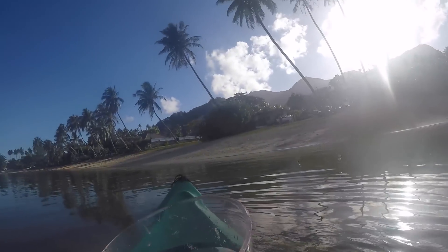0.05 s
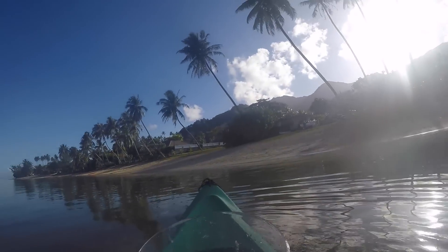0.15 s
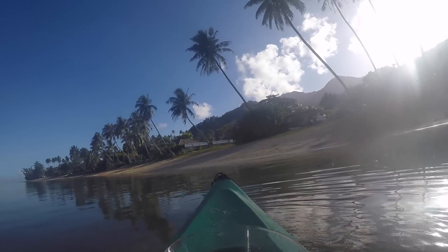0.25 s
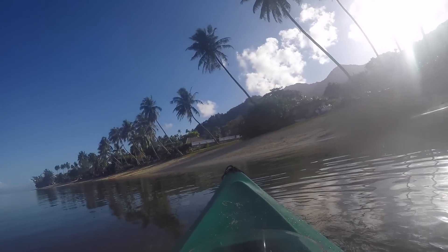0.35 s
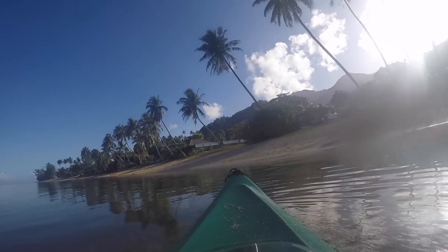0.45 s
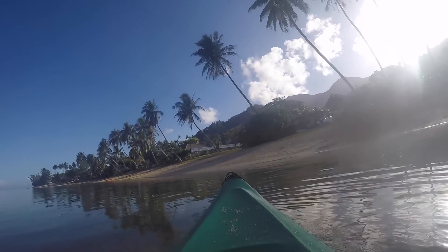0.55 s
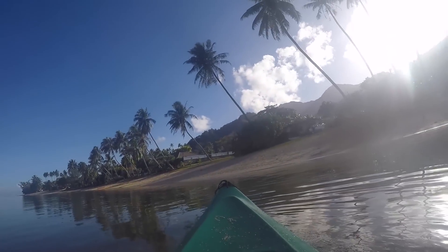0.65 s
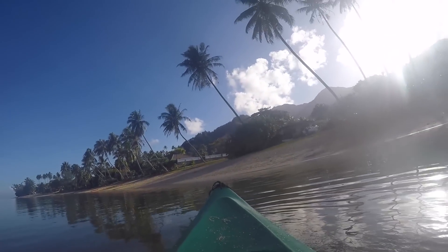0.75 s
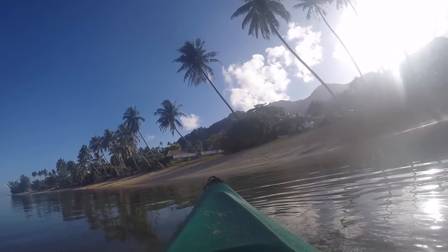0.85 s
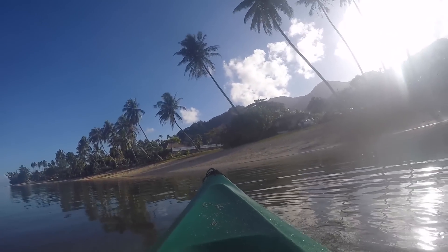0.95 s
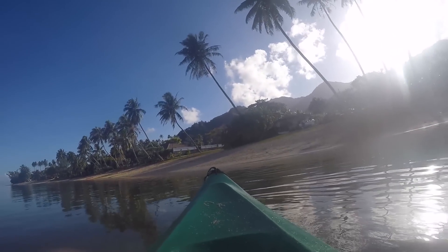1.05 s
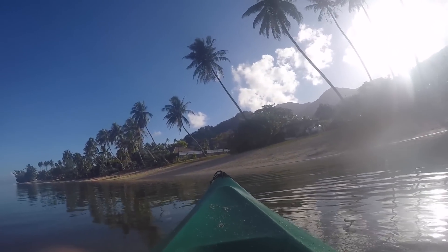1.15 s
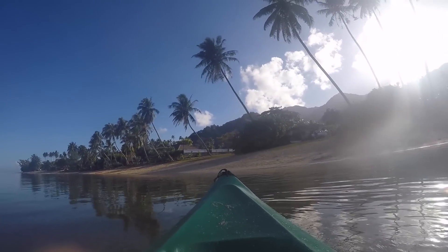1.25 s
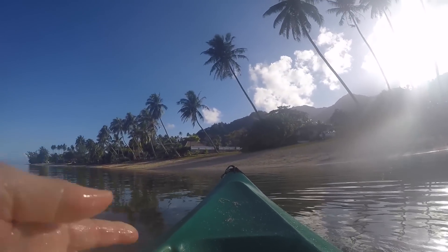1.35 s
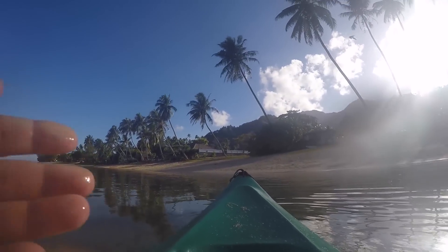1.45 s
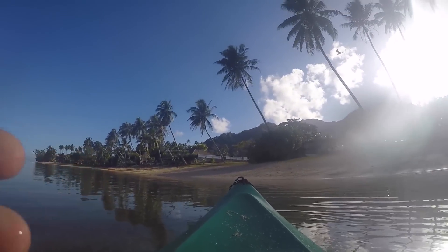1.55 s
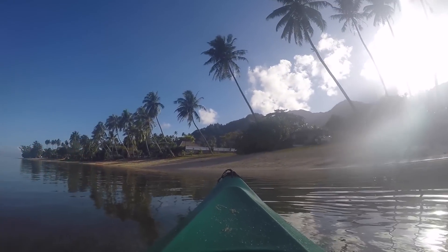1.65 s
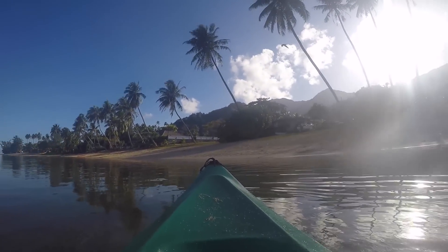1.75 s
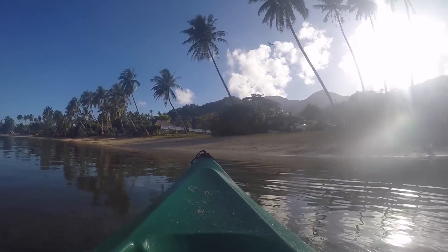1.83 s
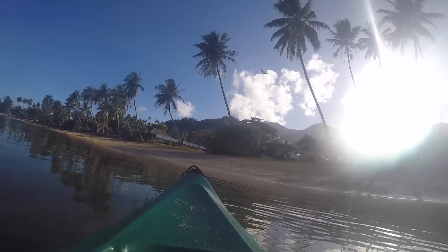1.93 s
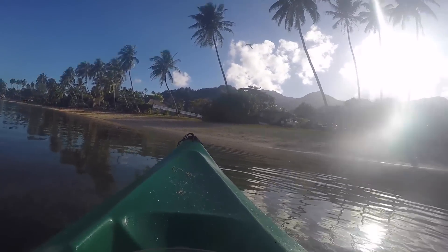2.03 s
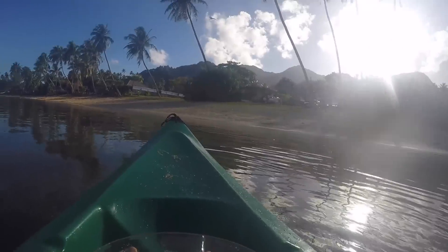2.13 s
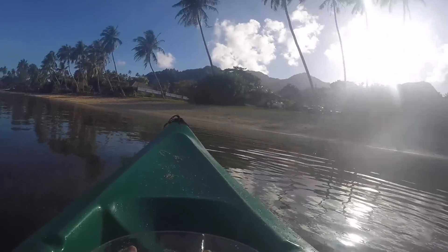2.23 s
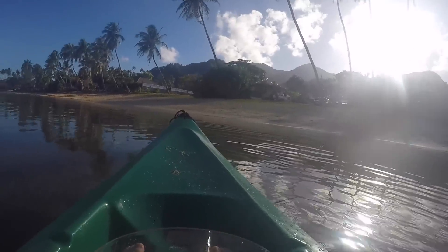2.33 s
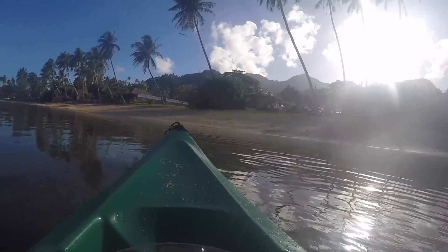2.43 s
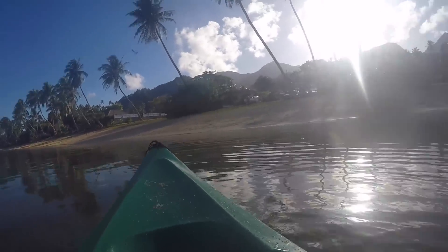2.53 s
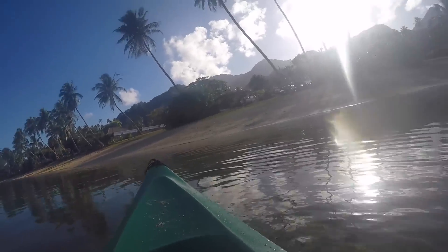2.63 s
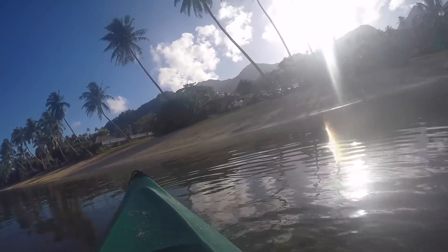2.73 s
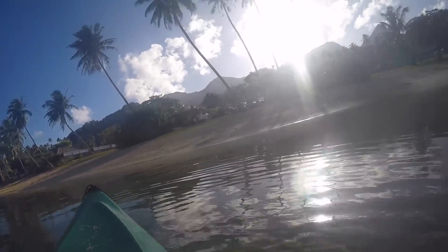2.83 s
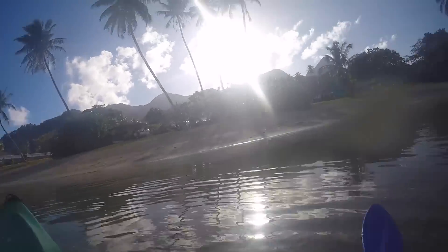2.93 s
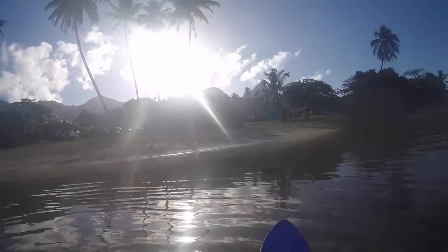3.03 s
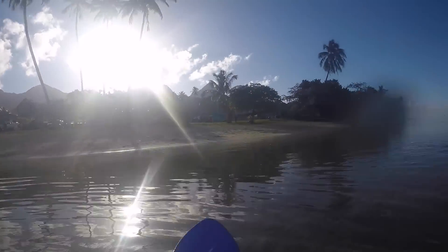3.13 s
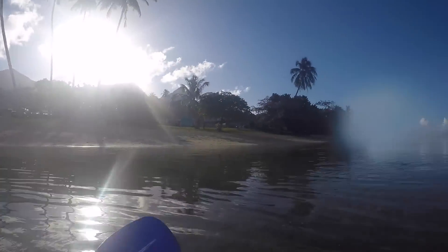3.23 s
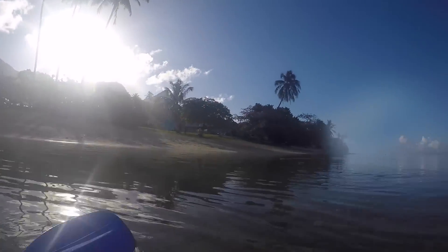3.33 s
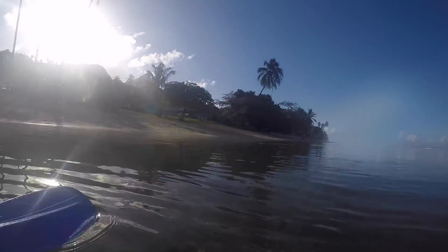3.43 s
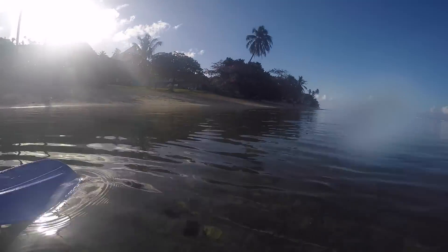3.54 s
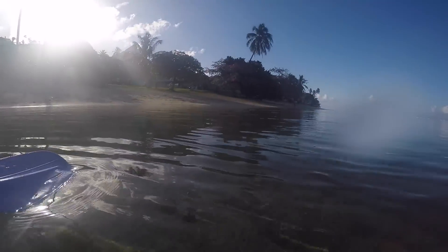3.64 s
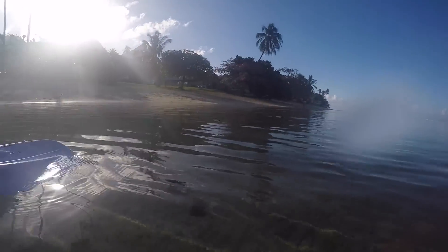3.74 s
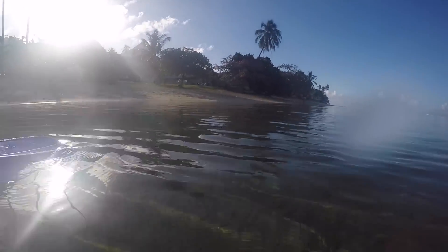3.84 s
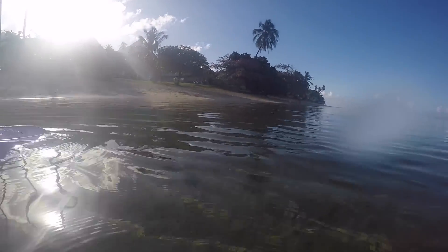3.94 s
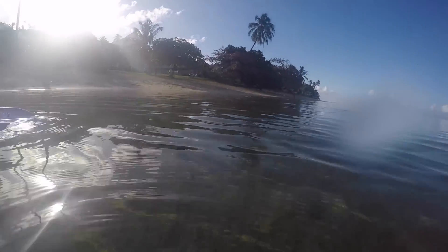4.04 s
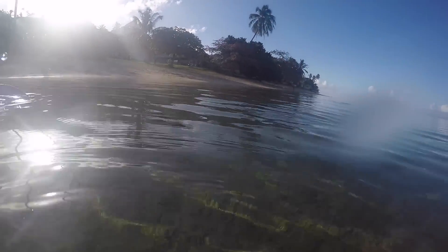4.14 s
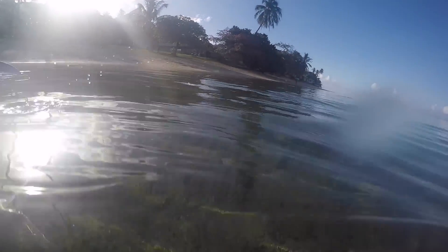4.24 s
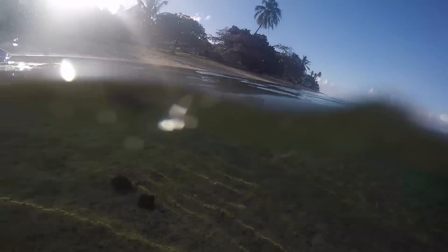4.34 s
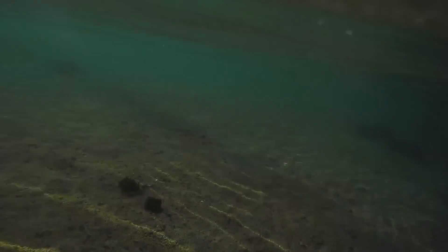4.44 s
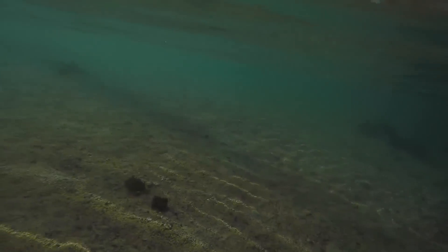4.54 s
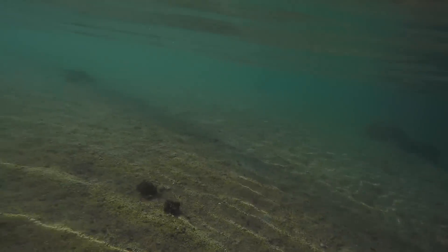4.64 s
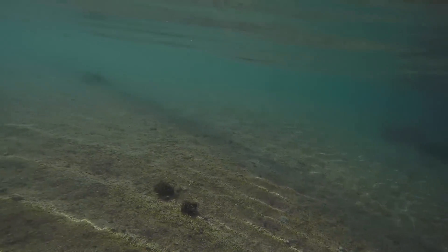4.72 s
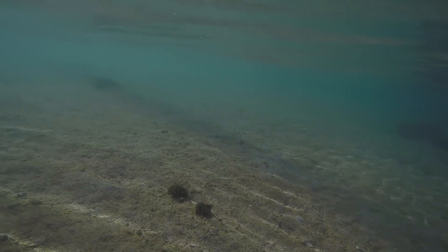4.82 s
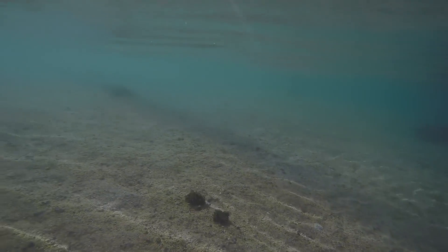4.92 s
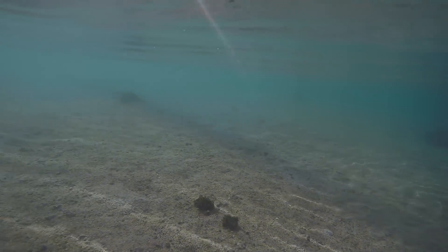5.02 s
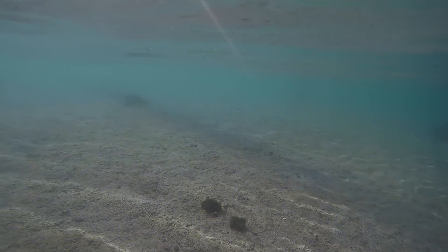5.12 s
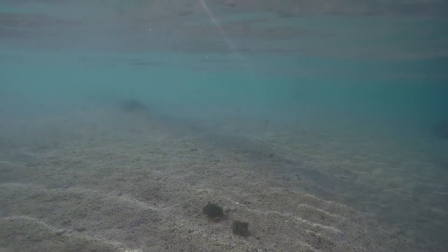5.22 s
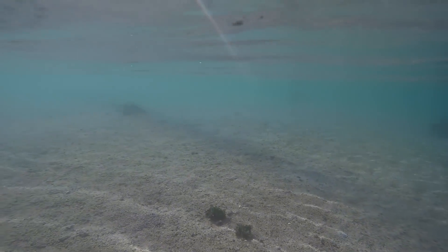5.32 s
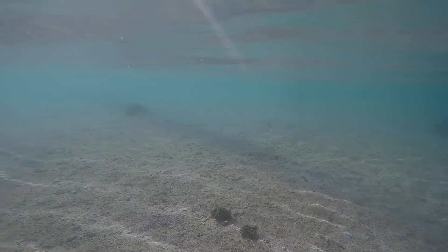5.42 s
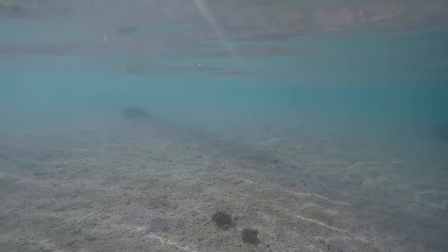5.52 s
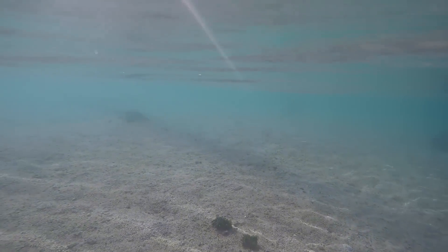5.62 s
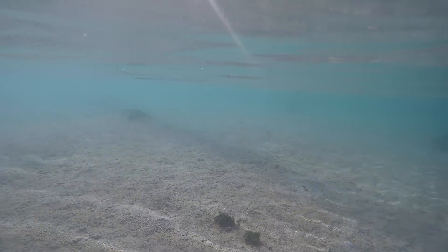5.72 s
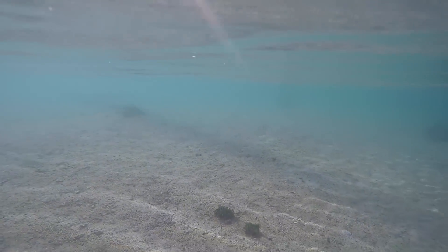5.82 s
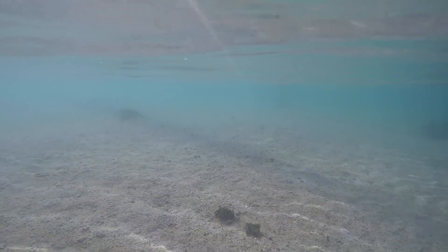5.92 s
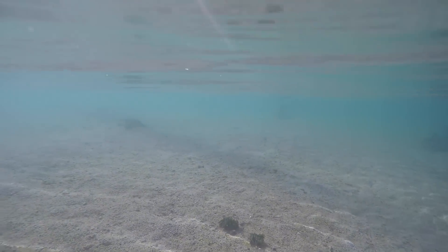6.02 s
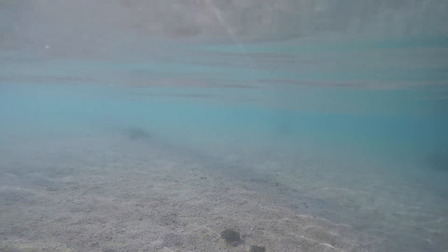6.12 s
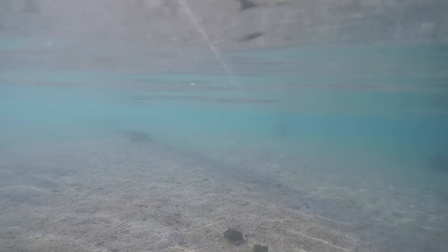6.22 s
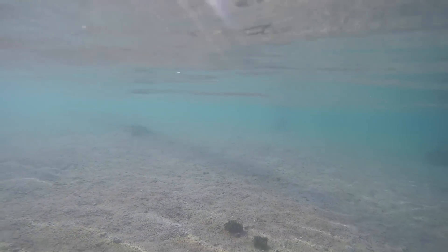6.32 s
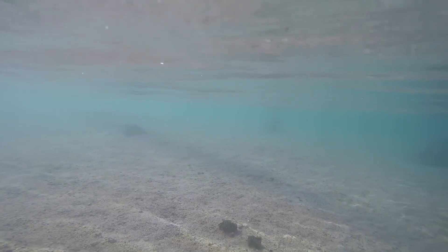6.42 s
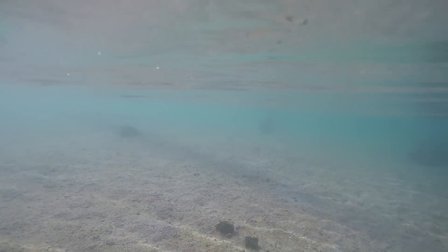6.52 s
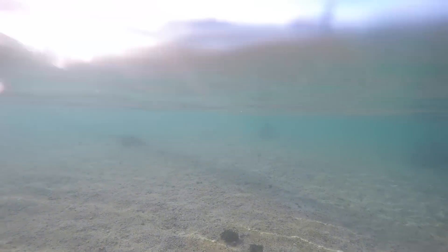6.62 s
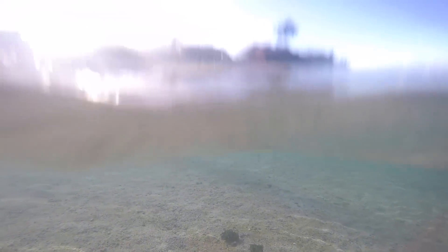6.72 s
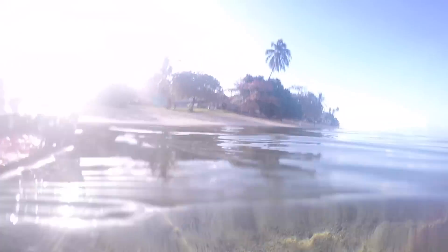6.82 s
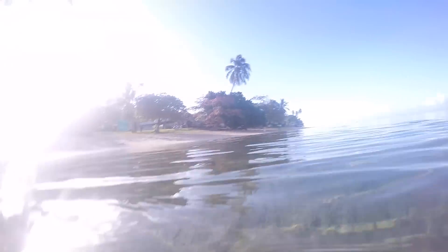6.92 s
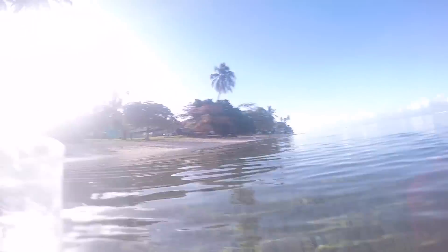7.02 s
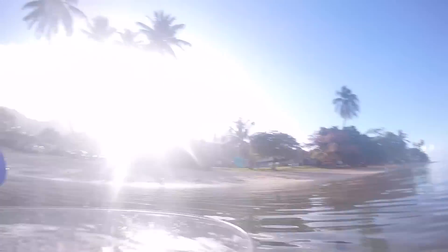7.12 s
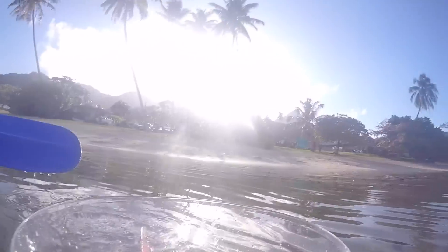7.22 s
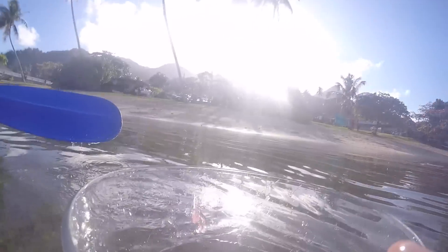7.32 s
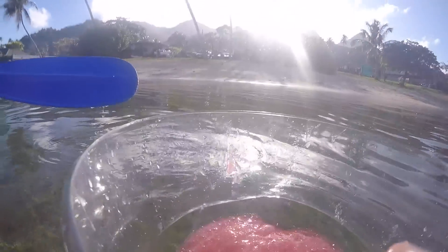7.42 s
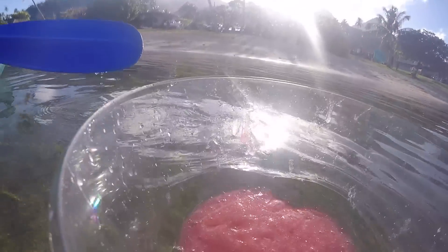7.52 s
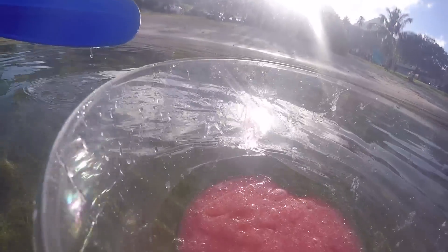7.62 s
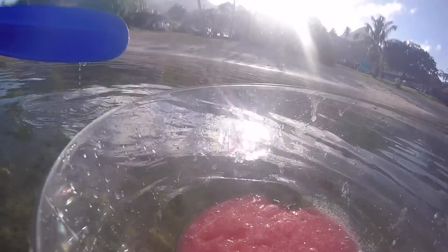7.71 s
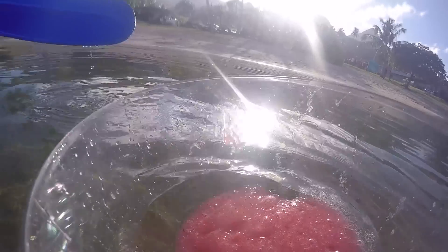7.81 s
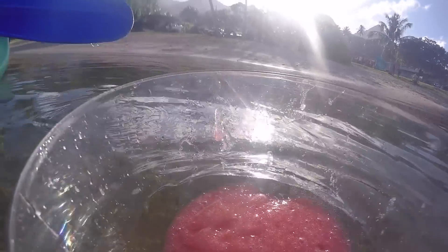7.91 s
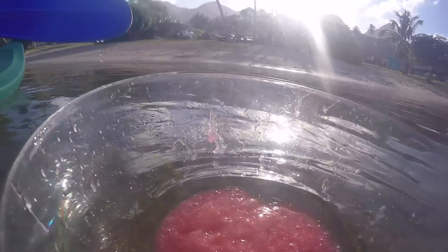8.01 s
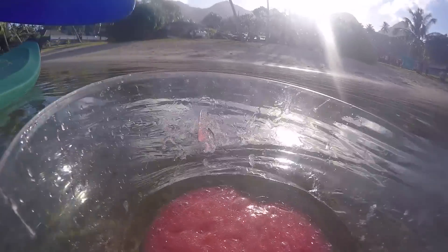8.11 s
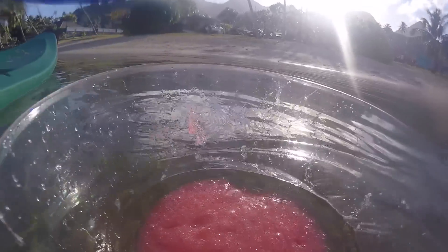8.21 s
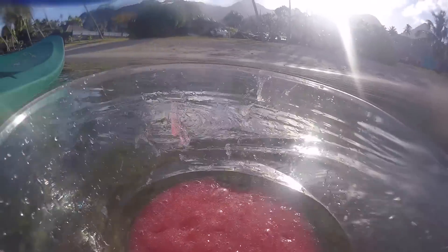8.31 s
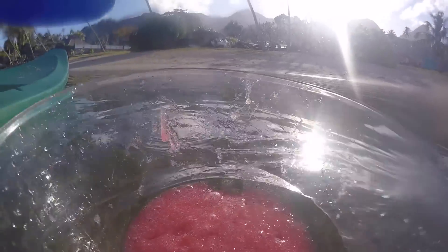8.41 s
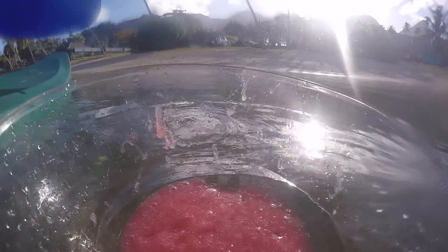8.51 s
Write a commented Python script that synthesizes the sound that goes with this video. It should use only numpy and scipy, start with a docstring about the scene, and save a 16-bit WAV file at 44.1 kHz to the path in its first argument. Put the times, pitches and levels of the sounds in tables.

```python
"""A hand-held camera in a waterproof case is dipped from a kayak into calm, shallow sea and lifted out again.
First wet fingers rub (tiny slips) and knock (ringing plastic) on the case, and its handling rumbles.
At the plunge, after 4.3 s, trapped air breaks into loud bubbles, heard as dying tones, among puffs of foam.
Under water it is quiet but for sharp ticks, short snaps that ring; these are heard above water as well.
On surfacing, at about 7 s, water sloshes off the case as crowds of small bubbles under a spray, then drips."""
import sys
import numpy as np
from scipy import signal
from scipy.fft import rfft, irfft
from scipy.io import wavfile
from scipy.ndimage import uniform_filter1d

SR = 44100
rng = np.random.default_rng(int(sys.argv[2]) if len(sys.argv) > 2 else 0)


def put_to_file(sound):
    """Save the sound as 16-bit audio at rate SR, in the file named by the first command-line argument."""
    columns = np.atleast_2d(sound).T  # one column per channel
    safe = np.clip(columns, -1, 1)
    whole_steps = np.round(safe * 32767)
    wavfile.write(sys.argv[1], SR, whole_steps.astype(np.int16))


N = 377496
T = np.arange(N) / SR   # time in seconds

# Soft bumps through the hand. Each row: start in seconds, peak level in dB, pitch in Hz,
# time to fall by 60 dB in seconds, contact cut-off in Hz.
BUMP_ROWS = [(0.116, -34, 120, 0.093, 300), (0.8624, -25, 105, 0.15, 400), (0.865, -24.5, 333, 0.051, 594),
             (1.595, -25.5, 133, 0.063, 298), (1.68, -27, 89, 0.089, 302), (1.729, -17, 45, 0.054, 250),
             (2.024, -17.5, 34.8, 0.12, 149), (2.15, 1, 38.8, 0.11, 250), (2.1532, -17, 112, .07, 260),
             (2.492, -3.5, 32.5, 0.17, 220), (2.7113, -11.5, 27.7, 0.21, 157), (3.477, -30, 98, 0.081, 250),
             (3.809, -31, 180, 0.096, 396), (4.168, -25.5, 168, 0.045, 300), (6.303, -31, 164, 0.024, 710),
             (7.156, -11.5, 42.5, 0.23, 191), (7.175, -15.5, 44.4, .12, 220), (7.484, -7, 39.6, 0.16, 70.4),
             (7.623, -20.5, 55, .045, 161), (8.408, -37.5, 212, 0.061, 397)]


def from_db(db):
    """Turn decibels into a gain."""
    return 10 ** (np.asarray(db) / 20)


def rms_one(x):
    """Scale to an average (rms) strength of 1."""
    return x / np.sqrt(np.mean(x ** 2) + 1e-20)


def peak_one(x):
    """Scale so that the highest peak is 1."""
    return x / np.max(np.abs(x))


def in_time(rows):
    """Draw straight lines between the rows of a table, sample by sample; one curve per column after the time."""
    s, *columns = np.transpose(rows)
    return [np.interp(T, s, column) for column in columns]


def add(track, s, sound):
    """Mix a sound into a track, starting at s seconds."""
    i = int(round(s * SR))
    track[i:i + len(sound)] += sound[:N - i]


def cut(x, hz, kind="low", order=2):
    """Keep what is below hz ("low") or above it ("high"), with a Butterworth filter."""
    return signal.sosfilt(signal.butter(order, min(hz, .45 * SR), kind, fs=SR, output="sos"), x)


def coloured(x, spectrum):
    """Shape the balance of pitches in a steady signal, steeply cut beyond both ends; rms 1."""
    hz, db = np.transpose(spectrum)
    octave = np.log2(np.maximum(np.fft.rfftfreq(N, 1 / SR), 1))
    outside = np.abs(octave - np.clip(octave, np.log2(hz[0]), np.log2(hz[-1])))   # octaves beyond the ends
    shape_db = np.interp(octave, np.log2(hz), db) - 36 * outside
    return rms_one(irfft(rfft(x) * from_db(shape_db), N))


def fall(t, t60):
    """Die away by 60 dB in t60 seconds."""
    return np.exp(-np.log(1000) * t / t60)


def drift(rate):
    """Wander at random between points drawn `rate` times a second, with spread 1 at the points."""
    knots = rng.standard_normal(int(rate * N / SR) + 2)
    return np.interp(T * rate, np.arange(len(knots)), knots)


def evened(x, span_s):
    """Take the slow swells out of a noise."""
    return x / np.sqrt(uniform_filter1d(x ** 2, int(span_s * SR)) + 1e-9)


def grains(per_s, spread_db):
    """Scatter clicks of uneven size and random sign over the whole time."""
    sizes = from_db(spread_db * np.minimum(rng.exponential(1, N), 5))
    return (rng.random(N) < per_s / SR) * sizes * rng.choice([-1, 1], N)


def mode(hz, t60):
    """Ring one struck tone that dies away."""
    t = T[:SR // 4]
    return np.sin(2 * np.pi * hz * t) * fall(t, t60)


def scatter(x, db, t60):
    """Smear a sound into a short diffuse tail of noise-like echoes."""
    t = T[:SR // 8]
    tail = rng.standard_normal(len(t)) * fall(t, t60)
    return from_db(db) * signal.fftconvolve(x, tail / np.sqrt(np.sum(tail ** 2)))[:N]


def swell(start, length, attack_s, release_s, sag_db=0):
    """Rise smoothly, sag along the length, then die away."""
    age = np.maximum(T - start, 0)
    near = (age > 0) & (age < length + 10 * release_s)
    t, out = age[near], np.zeros(N)
    rise = 1 - np.exp(-(t / attack_s) ** 2)
    sag = from_db(-sag_db * np.minimum(t / length, 1))
    out[near] = rise * sag * np.exp(-np.maximum(t - length, 0) / release_s)
    return out


def gestures(rows, attack_s, release_s, sag_db, edge_share=.14):
    """Strength of body and treble for strokes or gushes; long ones start and end more gently."""
    body, treble = np.zeros(N), np.zeros(N)
    for start, length, db, treble_db in rows:
        edge = edge_share * length   # seconds added to attack and release
        power = (from_db(db) * swell(start, length, attack_s + edge, release_s + edge, sag_db)) ** 2
        body += power
        treble += power * from_db(treble_db) ** 2
    return np.sqrt(body), np.sqrt(treble)


def through_case(x):
    """The case lifts its own narrow resonances in whatever slides over it; rms 1."""
    # Each row: pitch in Hz, width in Hz, added gain (plain factor).
    case_peaks = [(221, 22, 1.6), (492, 120, 1.1), (570, 51, 0.8), (890, 25, 0.78), (977, 88, 0.93),
                  (1055, 39, 0.29), (1381, 45, 0.92), (1776, 45, 0.68), (2970, 83, 1.3)]
    lifted = sum(gain * signal.lfilter(*signal.iirpeak(hz, hz / width, fs=SR), x)
                 for hz, width, gain in case_peaks)
    return rms_one(x + lifted)


def bubble_crowd(low_hz, high_hz, per_s, spread_db, cycles, count=20):
    """Small bubbles born at random, each ringing down by 60 dB in a few cycles at one of `count` pitches."""
    out = np.zeros(N)
    for hz in np.geomspace(low_hz, high_hz, count):
        r, w = from_db(-60 * hz / (cycles * SR)), 2 * np.pi * hz / SR   # decay and turn per sample
        births = grains(per_s / count, spread_db) + 1e-18
        out += np.sqrt(hz) * rms_one(signal.lfilter([1, 0, -1], [1, -2 * r * np.cos(w), r * r], births))
    return out


def bubbles(rise=0.026, echo_s=.0033, echo_db=-15, wobble=0.046):
    """Air bubbles and drops swell fast and ring down, wobbling as their pitch creeps up; the hull echoes them."""
    # Each row: start in seconds, pitch at the start in Hz, peak level in dB before the echoes and the notch,
    # time to fall by 60 dB in seconds.
    bubble_rows = [(2.2448, 1800, -19, .01), (2.28, 1510, -22.5, .02), (4.29, 960, -26.5, .025),
                   (4.334, 616, -20, .032), (4.3335, 5900, -30, .009), (4.338, 3000, -29, .02),
                   (4.3603, 1197, 2, .019), (4.363, 181, -16.5, .091), (4.3668, 4730, -19.5, .0065),
                   (4.369, 6300, -14.5, .0024), (4.3687, 3110, -8, .012), (4.3706, 2664, -6.5, .014),
                   (4.3714, 908, -3.5, .034), (4.3901, 2950, -15, .01), (4.3915, 1750, -4.5, .009),
                   (4.3937, 837, -9, 0.04), (4.3951, 586, -11, .032), (4.397, 143.8, -15, .058),
                   (4.3718, 430, -17.5, 0.044), (4.3992, 1975, -17.5, .012), (4.3995, 3000, -21, .025),
                   (4.4097, 1555, -18.5, .017), (4.4196, 2510, -1.5, .006), (4.423, 1251, 0.5, .026),
                   (4.4225, 2914, -16, .025), (4.431, 7190, -8, .005), (4.4701, 1210, -18.5, .02),
                   (4.471, 2110, -14.5, .003), (4.4707, 5360, -20, .007), (4.5298, 647, -17, .04),
                   (4.5291, 1410, -16, .038), (4.5535, 990, -35, .045), (4.553, 2200, -39.5, .008),
                   (4.616, 2326, 3.5, .011), (4.6156, 3110, -14.5, 0.019), (4.648, 858, -12, .031),
                   (4.6482, 1290, -14, .023), (4.696, 1351, -14.5, .032), (4.695, 3290, -9.5, 0.015),
                   (4.7664, 1936, -1.5, 0.016), (4.766, 2360, -10, .007), (4.818, 2170, 1.5, .011),
                   (7.034, 466, -19.5, .15), (7.048, 554, -19.5, 0.18), (7.061, 2380, -19, .016),
                   (7.125, 1820, -15.5, .015), (7.1865, 1906, -22.5, .054), (7.194, 1670, -30, 0.057),
                   (7.227, 1730, -25.5, .03), (7.2827, 1850, -27.5, .012), (7.389, 974, -24, .019),
                   (7.863, 3250, -53, 0.048)]
    swell_s, swell_cycles = 0.00042, 0.14   # a bubble swells for a moment plus a part of its cycle
    out, t = np.zeros(N), T[:SR // 8]
    for s, hz, db, t60 in bubble_rows:
        shake = rms_one(cut(rng.standard_normal(len(t)), hz / 3))
        pitch = hz * (1 + rise * np.minimum(t / t60, 1) + wobble * shake)
        phase = 2 * np.pi * np.cumsum(pitch) / SR
        envelope = (1 - np.exp(-(t / (swell_s + swell_cycles / hz)) ** 2)) * fall(t, t60)
        add(out, s, from_db(db) * peak_one(envelope) * np.sin(phase))
    echo = from_db(echo_db) * np.interp(T - echo_s, T, out)
    near_tail = scatter(out, db=-15.5, t60=0.005)
    far_tail = cut(scatter(out, db=-25, t60=0.061), 3000)
    heard = out + echo + near_tail + far_tail
    # the case passes little between its two lowest resonances
    return signal.lfilter(*signal.iirnotch(325, 1.6, fs=SR), heard)


def foam(grains_per_s=1200, spread_db=-0.5, cycles=9):
    """The plunge folds in crowds of tiny bubbles, puff by puff, as the case breaks the surface."""
    # Each row: start in seconds, level in dB.
    puffs = [(4.328, -39.5), (4.364, -19), (4.391, -21), (4.419, -24.5), (4.47, -37.5)]
    # Each row: pitch in Hz, relative level in dB per Hz.
    foam_colour = [(450, -3.5), (900, 6.5), (1800, 1.5), (3000, -1.5), (4500, -5.5), (6500, -13.5),
                   (9000, -24), (15000, -27.5)]
    attack_s, fade_s = 0.0036, 0.0087
    strength = sum(from_db(db) * swell(s, attack_s, attack_s, fade_s) for s, db in puffs)
    return strength * coloured(bubble_crowd(450, 14200, grains_per_s, spread_db, cycles), foam_colour)


def tick(hz, snap_db, ring_t60=0.0084, snap_t60=0.0015, edge_hz=9000, wall_hz=640, wall_db=-27, wall_t60=0.022):
    """A broad snap with a short ring, without bass; it faintly stirs the wall of the case."""
    t = T[:SR // 4]
    snap = cut(rng.standard_normal(len(t)) * fall(t, snap_t60), edge_hz, order=1)
    ping = cut(mode(hz, ring_t60) + from_db(snap_db) * peak_one(snap), 1300, "high")
    return ping + from_db(wall_db) * mode(wall_hz, wall_t60)


def ticks(crackle_db=-52.0, crackle_per_s=70):
    """Sharp ticks of water on the case, over a faint, dry crackle of mixed pitch."""
    # Each row: start in seconds, level of the ring in dB before its bass is cut, pitch of the ring in Hz,
    # level of the snap in dB against the ring.
    tick_rows = [(0.054, -38.5, 2700, 8.5), (.236, -50, 3500, 14), (0.904, -35, 3300, 3),
                 (0.9453, -40, 4300, 5), (1.7089, -15, 5320, -5), (1.7113, -16, 2560, -17),
                 (2.246, -27.5, 3170, -17), (2.2804, -27.5, 2600, -3.5), (2.6586, -39, 4220, 0),
                 (2.9029, -35, 2500, 1), (3.538, -37, 4170, -17), (3.698, -42.5, 2900, -14),
                 (3.806, -42.5, 5000, 7), (4.2244, -42, 5670, -9), (4.25, -33, 4440, -14),
                 (4.3155, -40.5, 5400, 12), (4.3504, -19.5, 5140, 4), (4.357, -21, 2190, 1),
                 (4.368, -13, 3500, -18), (4.3895, -17, 3230, 5.5), (4.3917, -20, 4100, 2.5),
                 (4.4178, -23, 4030, -9), (4.4329, -15, 3830, 4), (4.4613, -22, 2720, 7),
                 (4.4733, -23.5, 4010, -18), (4.592, -19.5, 2633, -9), (4.6147, -4, 2700, -38),
                 (4.7336, -37, 2300, 4), (4.8013, -24, 2300, -9), (4.8202, -21, 2590, -1),
                 (4.8638, -32, 2500, 6), (5.374, -50.5, 5800, 14), (5.5105, -39, 5900, 3),
                 (5.7716, -41.5, 5220, 3), (6.278, -37.5, 2357, 5.5), (6.305, -35.5, 2370, 1),
                 (6.3496, -13, 2410, -2.5), (6.3512, -23, 1930, -22), (6.3518, -23, 3330, -8),
                 (6.3732, -32, 2230, 3), (6.3945, -42, 2090, -7), (6.4121, -31, 2520, 10),
                 (7.521, -47, 6670, 16.5), (7.536, -43, 5500, 5), (7.8296, -42.5, 3290, 8),
                 (7.909, -42, 3480, -2.5), (8.0754, -31, 3086, -16.5)]
    out = np.zeros(N)
    for s, db, hz, snap_db in tick_rows:
        add(out, s, from_db(db) * tick(hz, snap_db))
    pitches = (2400, 3600, 5500)   # Hz
    for hz in pitches:
        pop = peak_one(tick(hz, snap_db=13))
        pops = signal.fftconvolve(grains(crackle_per_s / len(pitches), 3.0), pop)[:N]
        out += from_db(crackle_db) * pops   # the level of the smallest pops
    return out


def knocks(crack_db=-9, crack_t60=0.037, vary_db=1):
    """Hard knocks and slaps crack and ring the modes of the plastic case; hand and water damp them."""
    # Each row: start in seconds, peak level in dB, contact cut-off in Hz, factor on the ring times of the case.
    knock_rows = [(0.8567, -13.5, 4500, 1.07), (1.5429, -23, 1380, 1.1), (1.672, -22, 1480, 0.77),
                  (1.7069, -22.5, 7000, 0.67), (1.7856, -25, 2000, 0.68), (2.0204, -21.5, 1100, 3.3),
                  (2.4893, -17, 940, 0.24), (2.6949, -22.5, 990, 2.6), (2.7056, -17, 960, 0.25),
                  (3.451, -31, 1950, 0.76), (3.805, -25.5, 1030, 1.2), (4.1568, -20, 1900, 0.3),
                  (4.1687, -19, 1900, 0.23), (4.213, -26.5, 2030, 0.25), (7.1228, -17, 1990, 0.46),
                  (7.2137, -17.5, 1910, 0.5), (7.2595, -25.5, 2500, 0.29), (7.273, -27, 2000, 0.19),
                  (7.335, -28.5, 2520, 0.35)]
    # Each row: pitch in Hz, relative level in dB, time to fall by 60 dB in seconds before a knock's own factor.
    case_modes = [(217, -25, 0.2), (315, -32, 0.027), (534, 2.5, 0.0057), (753, 4.5, 0.011),
                  (975, 5, 0.021), (1305, -1.5, 0.024), (1856, 1.5, 0.017), (2800, -24, 0.032),
                  (2990, -5.5, 0.02), (4000, -6.5, 0.013), (4850, 3.5, 0.0046), (6360, 6, 0.0019),
                  (8780, 1.5, 0.0051), (12000, -33, .01)]
    out, t = np.zeros(N), T[:SR // 4]
    for s, db, contact_hz, length in knock_rows:
        ring = np.zeros(len(t))
        for k, (hz, level, t60) in enumerate(case_modes):
            varied = from_db(level + vary_db * rng.standard_normal())
            ring += varied * (-1) ** k * mode(hz, t60 * length)
        crack = from_db(crack_db) * rng.standard_normal(len(t)) * fall(t, crack_t60 * length)
        add(out, s, from_db(db) * peak_one(cut(ring + crack, contact_hz)))
    return out


def bumps(case_hz=205, case_db=-17, case_t60=0.08):
    """A bump is a sudden step of pressure that swings back slowly and sets the case booming."""
    out, t = np.zeros(N), T[:SR // 4]
    for s, db, hz, t60, contact_hz in BUMP_ROWS:
        push = np.cos(2 * np.pi * hz * t) * fall(t, t60)
        boom = from_db(case_db) * mode(case_hz, case_t60)
        add(out, s, from_db(db) * peak_one(cut(push + boom, contact_hz, order=4)))
    return out


def finger_strokes():
    """A stroke of wet fingers bites, eases off along its length and lets go."""
    # Each row: start in seconds, length in seconds, level in dB, treble in dB against that level.
    stroke_rows = [(.1, 0.014, -41.5, -23), (.21, 0.098, -40, -22.5), (.31, 0.077, -46.5, -20),
                   (.47, 0.051, -54.5, -24), (.61, 0.051, -53.5, -33), (.78, 0.12, -56, -38),
                   (.868, 0.1, -41, -19), (.99, 0.037, -41.5, -16), (1.095, 0.14, -44.5, -21.5),
                   (1.25, 0.29, -48, -42), (1.34, 0.049, -44, -16), (1.51, 0.068, -36.5, -16),
                   (1.572, 0.038, -35.5, -14.5), (1.65, 0.063, -33.5, -16.5), (1.77, 0.046, -35, -20),
                   (1.89, 0.042, -48, -13), (2.003, .028, -32, -19), (2.035, 0.061, -41.5, -25),
                   (2.088, 0.055, -35.5, -17), (2.17, 0.086, -47, -15), (2.295, 0.019, -41, -15),
                   (2.37, 0.045, -53.5, -12), (2.445, 0.037, -45.5, -15), (2.483, 0.015, -30, -17.5),
                   (2.68, 0.015, -33, -15), (2.715, 0.019, -42.5, -16), (2.76, 0.16, -47.5, -16),
                   (3.1, 0.072, -39, -15.5), (3.2, 0.046, -43, -14), (3.29, 0.065, -49, -25),
                   (3.4, 0.1, -46.5, -23), (3.52, 0.032, -41, -19), (3.73, 0.15, -48.5, -39),
                   (3.84, .1, -42, -28), (3.95, .22, -47, -21.5), (4.225, 0.089, -43, -21),
                   (6.75, 0.018, -55, -27.5)]
    return gestures(stroke_rows, attack_s=0.0056, release_s=0.005, sag_db=2)


def rubbing(stroke, stroke_treble, slips_per_s=1900, spread_db=1.0, judder_db=4.0):
    """Wet skin slides in countless tiny slips that sound through the case; more treble brightens the body."""
    # Body of the rub before the case resonances. Each row: pitch in Hz, relative level in dB per Hz.
    rub_colour = [(150, -7), (215, 1.5), (270, -7), (345, -13), (480, -1.5), (660, -4.5), (960, -2.5),
                  (1300, -4), (1850, -3), (2300, -7), (2900, -13), (3500, -53.5)]
    # Treble of the rub. Each row: pitch in Hz, relative level in dB per Hz.
    rub_treble = [(3200, -4.5), (4200, -10), (5300, -8.5), (6600, -11.5), (7800, -26), (10500, -17),
                  (12200, -16.5), (15000, -29)]
    grip_db, grip_treble_db, under_s = -61, -15, 4.3   # holding fingers never quite rest until the case goes under
    dull_hz, bright_db = 1510, 8   # above this pitch the body grows with the treble; gain of that part
    slips = grains(slips_per_s, spread_db) * from_db(judder_db * drift(90))
    grip = from_db(grip_db) * (T < under_s)
    level = np.hypot(stroke, grip)
    treble = np.hypot(stroke_treble, grip * from_db(grip_treble_db))
    body = through_case(coloured(slips, rub_colour))
    dull = level * cut(body, dull_hz, order=3)
    bright = from_db(bright_db) * np.sqrt(level * treble) * cut(body, dull_hz, "high", order=3)
    return dull + bright + treble * coloured(slips, rub_treble)


def squeak(waver=0.0055):
    """For a moment the slips of a wet finger lock into a thin, wavering tone."""
    # Each row: time in seconds, pitch in Hz before the waver, level in dB.
    squeak_rows = [(.755, 4100, -85), (.775, 4130, -64), (.795, 4100, -60), (.82, 4120, -76)]
    hz, level_db = in_time(squeak_rows)
    sounding = (T > squeak_rows[0][0]) * (T < squeak_rows[-1][0])
    phase = 2 * np.pi * np.cumsum(hz * (1 + waver * drift(300))) / SR
    return sounding * from_db(level_db) * np.sin(phase)


def water_gushes():
    """Water gushes off the lifted case, each time rising fast and easing off."""
    # Each row: start in seconds, length in seconds, level in dB, spray in dB against that level.
    gush_rows = [(6.979, .026, -29.5, -19), (7.025, 0.07, -31.5, -11.5), (7.1, 0.11, -35.5, -18),
                 (7.2, .085, -43, -23), (7.33, 0.089, -48, -17), (7.445, 0.098, -46.5, -14.5),
                 (7.64, 0.057, -47, -14.5), (7.785, 0.023, -48.5, -20)]
    return gestures(gush_rows, attack_s=0.0072, release_s=0.0058, sag_db=2.5)


def runoff(gush, gush_spray, drops_per_s=450, spread_db=3, cycles=18, lumps_db=3, drained_s=7.42,
           late_share=0.46, plops_per_s=45, plop_db=-13, plop_cycles=55):
    """Water pours off in lumps, small bubbles under a fine spray, then thins to a film; drops plop throughout."""
    # Body of the water before the case resonances. Each row: pitch in Hz, relative level in dB per Hz.
    runoff_colour = [(150, -47), (250, -23), (341, -24), (469, -12.5), (542, -15), (714, -14), (972, -14.5),
                     (1350, -16.5), (1840, -16), (2510, -20), (3500, -39), (4550, -63), (7700, -120)]
    # Spray. Each row: pitch in Hz, relative level in dB per Hz.
    runoff_treble = [(3200, -2.5), (4100, -10), (5100, 1), (5900, -12), (6700, -12), (7400, -29),
                     (15000, -30)]
    # between gushes a film drains away from the moment the case comes up, down to a trickle
    surface_s, film_db, drain_db_per_s, trickle_db = 6.98, -47, 21.5, -66.5
    film_level = from_db(film_db - drain_db_per_s * np.maximum(T - surface_s, 0))
    draining = (T > surface_s) * (film_level + from_db(trickle_db))
    pouring = np.interp(T, [7.25, drained_s], [.9, late_share])   # share of the sound's power from bubbles
    gurgle = coloured(evened(bubble_crowd(287, 3380, drops_per_s, spread_db, cycles), 0.065), runoff_colour)
    film = coloured(grains(6100, 3.0), runoff_colour)
    plops = from_db(plop_db) * rms_one(bubble_crowd(1155, 3010, plops_per_s, 2.6, plop_cycles, count=11))
    flow = through_case(np.sqrt(pouring) * gurgle + np.sqrt(1 - pouring) * film)
    body = np.hypot(gush, draining) * (flow + plops)
    spray = gush_spray * np.sqrt(pouring) * coloured(grains(3400, spread_db), runoff_treble)
    lumps = from_db(lumps_db * pouring * drift(120))
    return lumps * (body + spray)


def swish_drag():
    """Strength of skin or water dragging over the case, each time a smooth hump."""
    # Each row: middle in seconds, level in dB, half length in seconds.
    swish_rows = [(2.13, -34, 0.019), (4.856, -39, 0.017), (4.947, -35.5, 0.016), (5.686, -43.5, 0.023),
                  (6.772, -51.5, .014), (6.862, -53.5, 0.023), (7.054, -26.5, 0.016), (7.114, -29.5, 0.011)]
    return sum(from_db(db) * np.exp(-np.minimum(((T - s) / half) ** 2 / 2, 20)) for s, db, half in swish_rows)


def swishes(drag):
    """Dragging over the case stirs its muffled resonances into dull swishes."""
    # Each row: pitch in Hz, width in Hz, relative level in dB.
    swish_modes = [(488, 42, 23), (613, 40, 18), (1080, 170, -20), (1830, 620, -0.5), (2620, 450, 6)]
    flow = rng.standard_normal(N)
    body = sum(from_db(db) * signal.lfilter(*signal.iirpeak(hz, hz / width, fs=SR), flow)
               for hz, width, db in swish_modes)
    return drag * evened(cut(body, 2240, order=4), 0.054)


def handling(stroke, gush, drag):
    """The moving arm and every bump sway the case; its walls flex with these and with all that slides over them."""
    # Movement of the arm that holds the camera. Each row: time in seconds, level of the sway in dB.
    motion_rows = [(0, -40), (.45, -38.5), (1.05, -48.5), (1.7, -25.5), (2.05, -23.5), (2.35, -31.5),
                   (2.7, -28.5), (2.95, -39), (3.45, -33.5), (3.8, -37), (4.35, -32), (4.8, -37.5),
                   (5.7, -38.5), (6.6, -43), (7.1, -22.5), (7.6, -21), (7.9, -34.5), (8.55, -26.5)]
    # Deep rumble of the sway. Each row: pitch in Hz, relative level in dB per Hz.
    sway_colour = [(15, 6), (26, 0), (38, -3), (56, -13), (80, -23.5), (130, -33)]
    # Boom of the flexing walls. Each row: pitch in Hz, relative level in dB per Hz.
    flex_colour = [(70, 4.5), (110, -6.5), (150, -6), (205, -1), (232, -8), (290, -24), (380, -35)]
    flex_db, flex_follows = -34, .65   # flexing at full-scale sway; share of the sway's swing in dB
    rub_flex_db, gush_flex_db, swish_flex_db = -5, 0.5, -4   # against the stroke, gush or swish that causes it
    # the grip shifts around each bump: times before and after, levels against the bump
    lead_s, fade_s, jolt_sway_db, jolt_flex_db = 0.0065, 0.022, -13, -22.5
    motion_db, = in_time(motion_rows)
    jolt = np.zeros(N)
    for s, db, *_ in BUMP_ROWS:
        distance = np.maximum((s - T) / lead_s, (T - s) / fade_s)
        jolt += from_db(db) * np.exp(-np.minimum(distance, 20))
    sway = np.hypot(from_db(motion_db), from_db(jolt_sway_db) * jolt)
    causes = [from_db(flex_db + flex_follows * motion_db), from_db(jolt_flex_db) * jolt,
              from_db(rub_flex_db) * stroke, from_db(gush_flex_db) * gush, from_db(swish_flex_db) * drag]
    flex = np.linalg.norm(causes, axis=0)   # powers add up
    rumble = evened(coloured(rng.standard_normal(N), sway_colour), .12)
    boom = evened(coloured(rng.standard_normal(N), flex_colour), .1)
    return sway * rumble + flex * boom


def steady_hiss(level_db=-62):
    """A steady hiss of random noise lies under everything."""
    # Each row: pitch in Hz, relative level in dB per Hz.
    hiss_colour = [(250, 1), (420, -2), (640, 1), (850, -9.5), (1500, -14), (2500, -9), (3300, -15),
                   (5600, -14.5), (7000, -21.5), (12000, -20), (14600, -18.5), (16000, -29.5)]
    return from_db(level_db) * coloured(rng.standard_normal(N), hiss_colour)


def scene():
    """Water, hand and hiss add up at the one microphone."""
    stroke, stroke_treble = finger_strokes()
    gush, gush_spray = water_gushes()
    drag = swish_drag()
    water = bubbles() + foam() + ticks() + runoff(gush, gush_spray) + swishes(drag)
    hand = knocks() + bumps() + rubbing(stroke, stroke_treble) + squeak() + handling(stroke, gush, drag)
    return (water + hand + steady_hiss())[None]


def record(dry, top=.94, cutoff_hz=16000):
    """The loudest peaks overload with rounded tops; the highest treble is cut."""
    rounded = dry / (1 + (dry / top) ** 8) ** (1 / 8)
    return signal.sosfilt(signal.ellip(10, .1, 80, cutoff_hz, fs=SR, output="sos"), rounded)


dry = scene()
out = record(dry)
put_to_file(out)
```